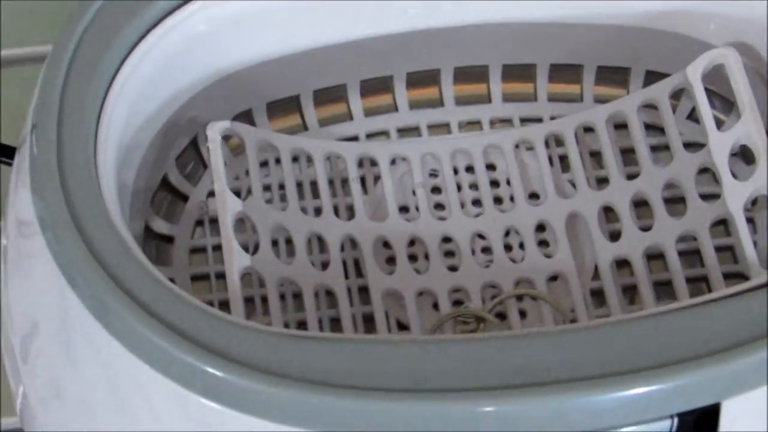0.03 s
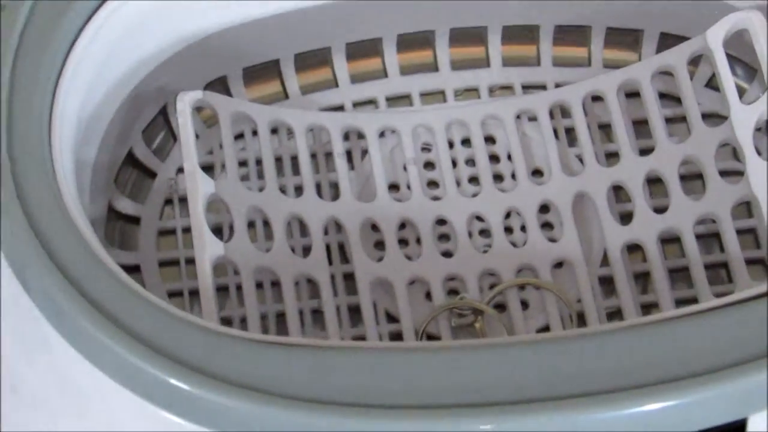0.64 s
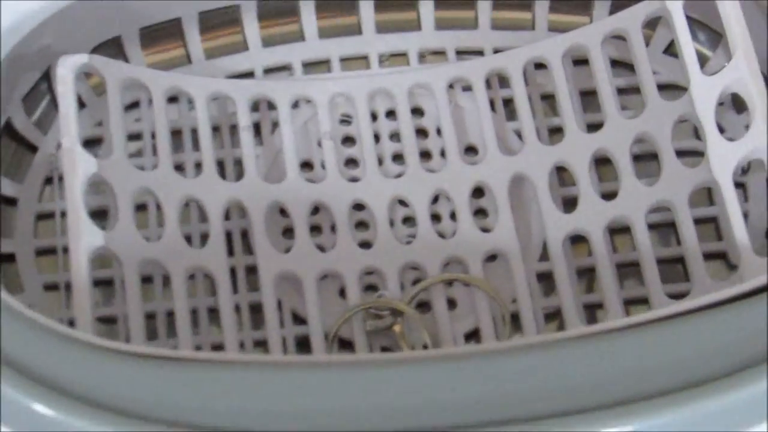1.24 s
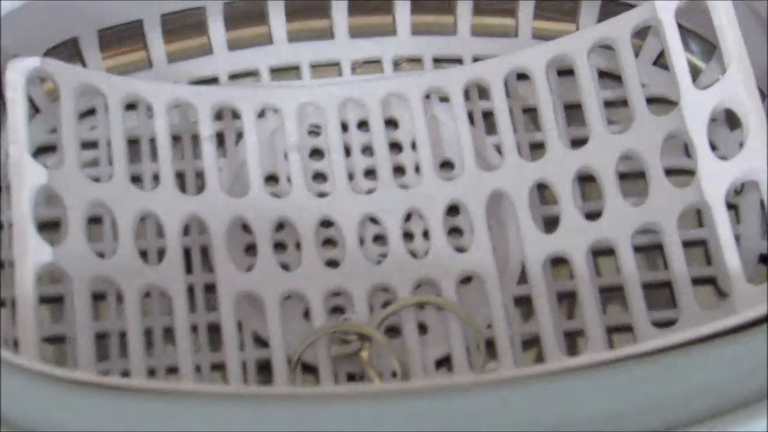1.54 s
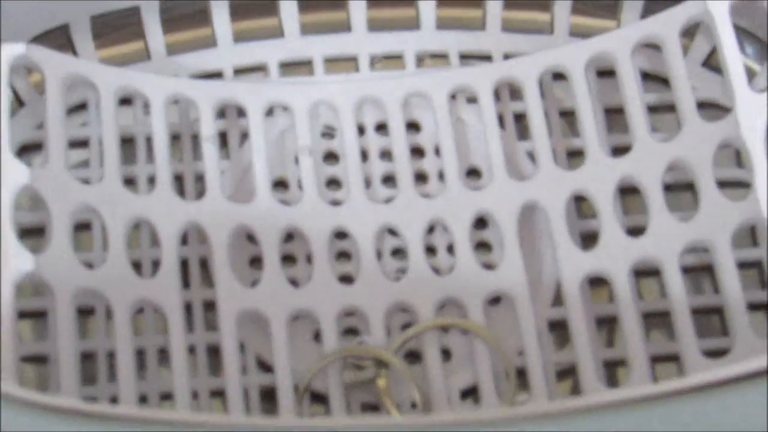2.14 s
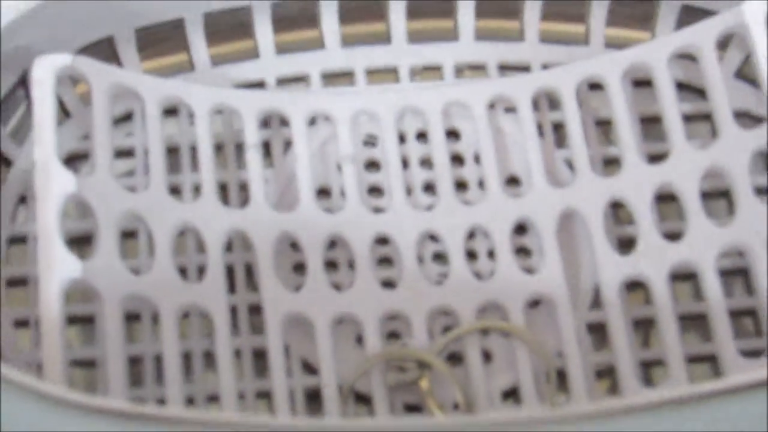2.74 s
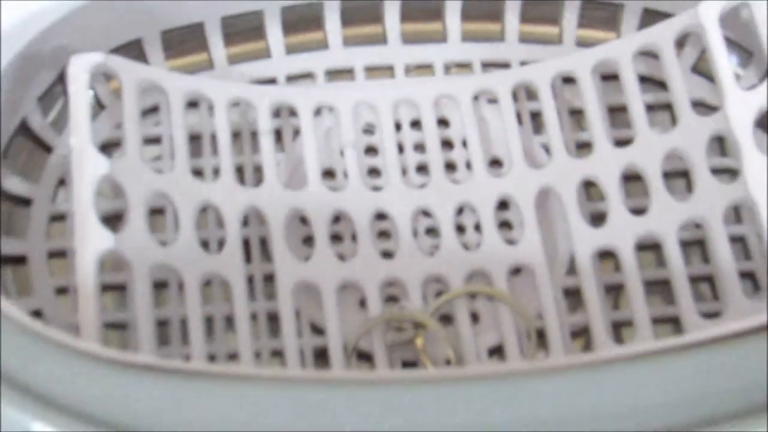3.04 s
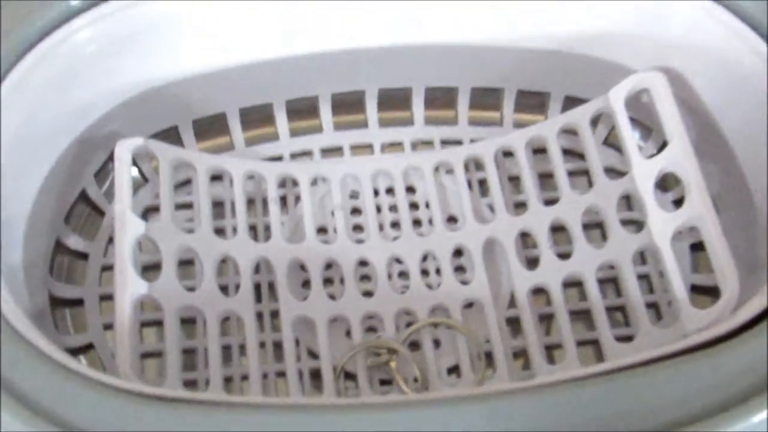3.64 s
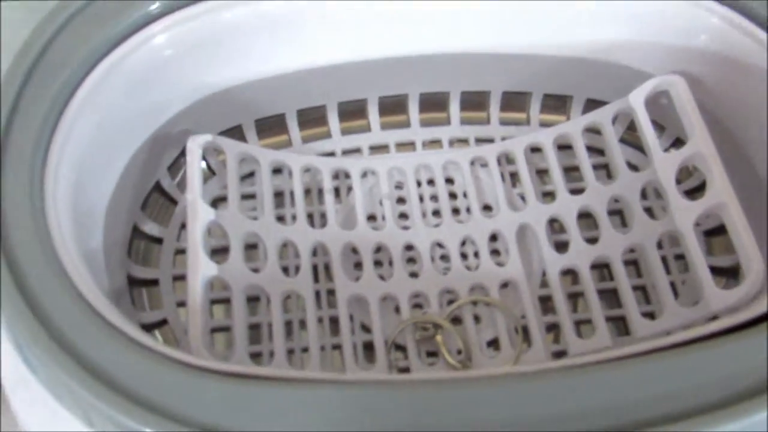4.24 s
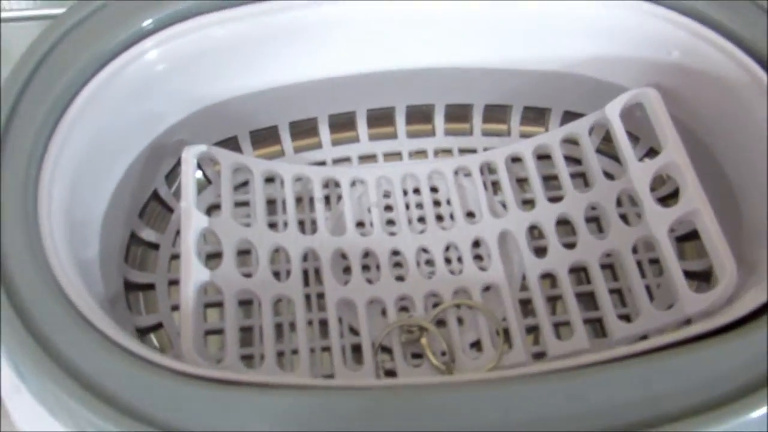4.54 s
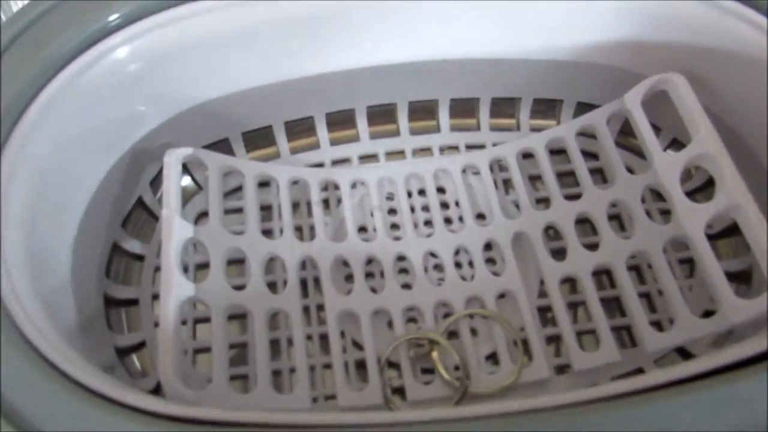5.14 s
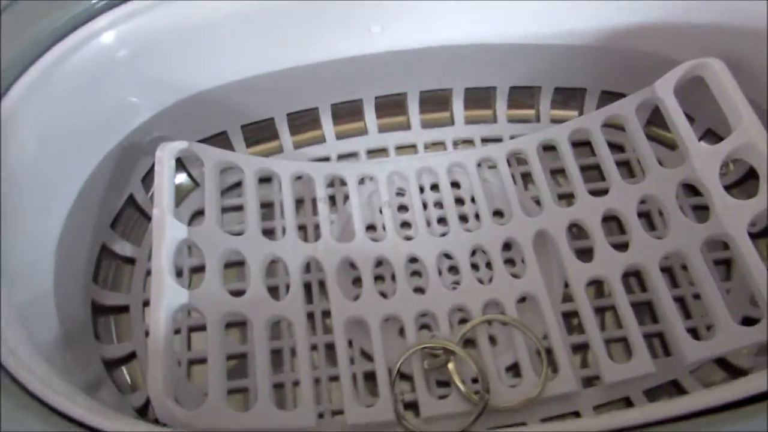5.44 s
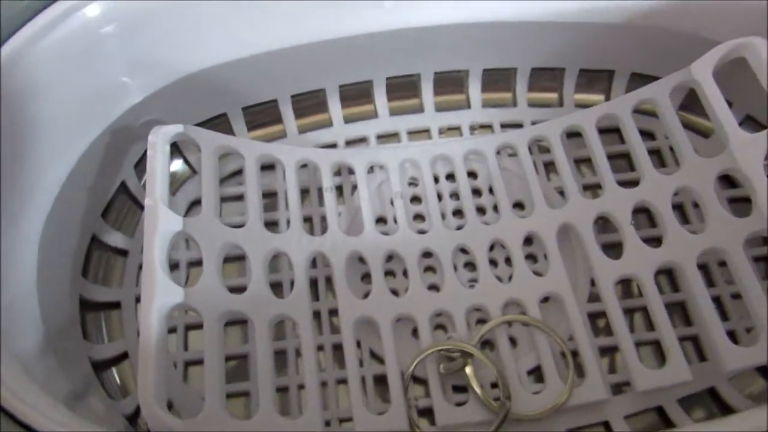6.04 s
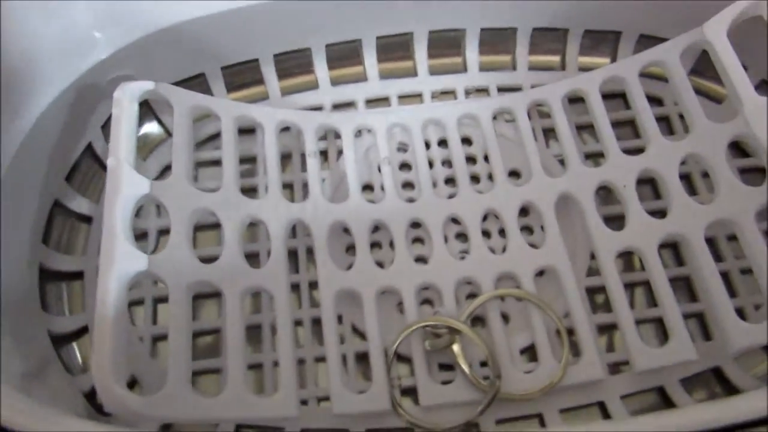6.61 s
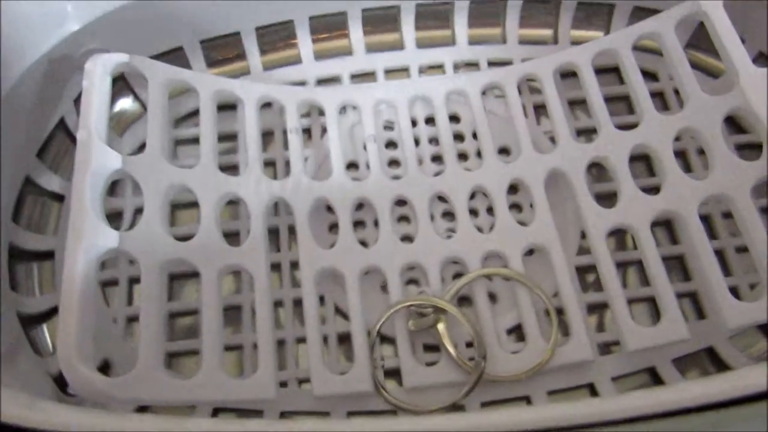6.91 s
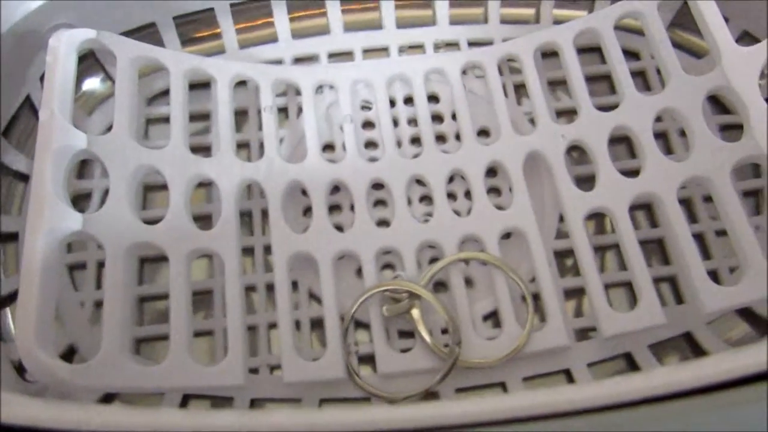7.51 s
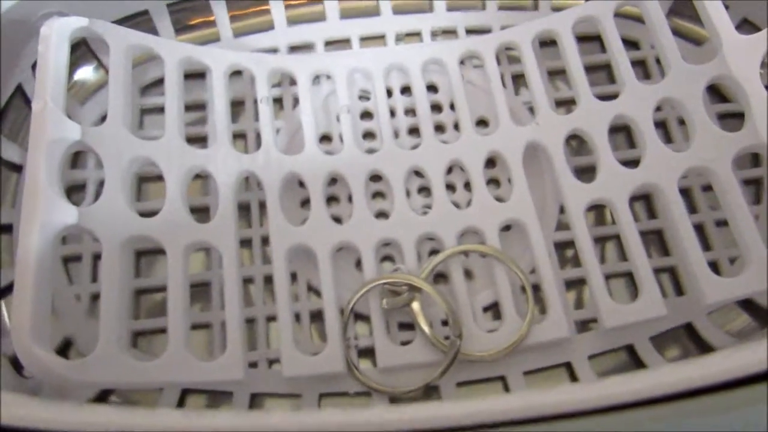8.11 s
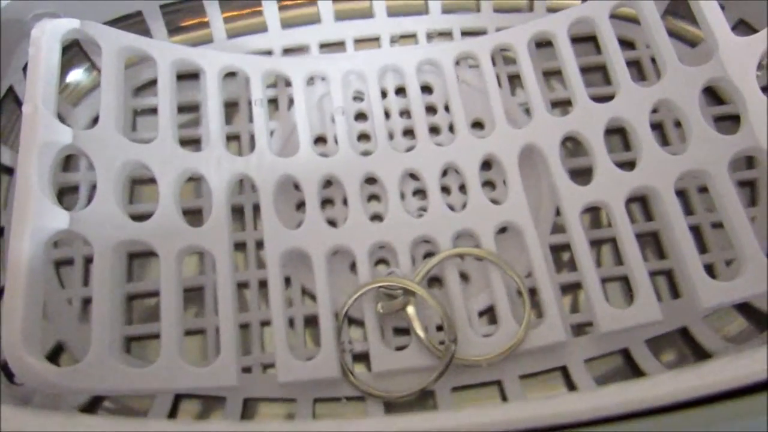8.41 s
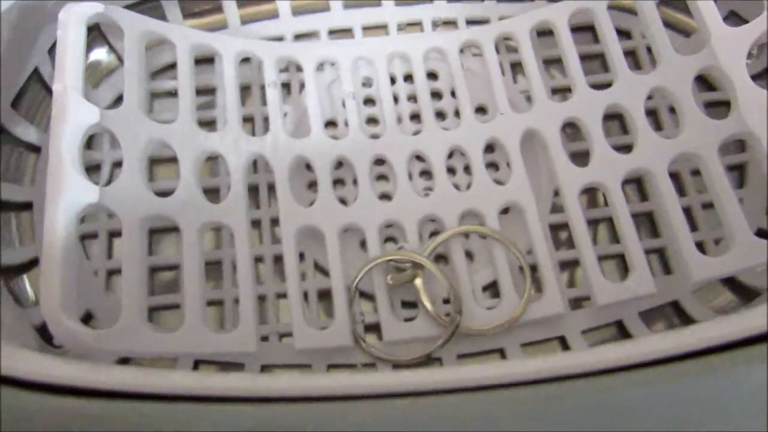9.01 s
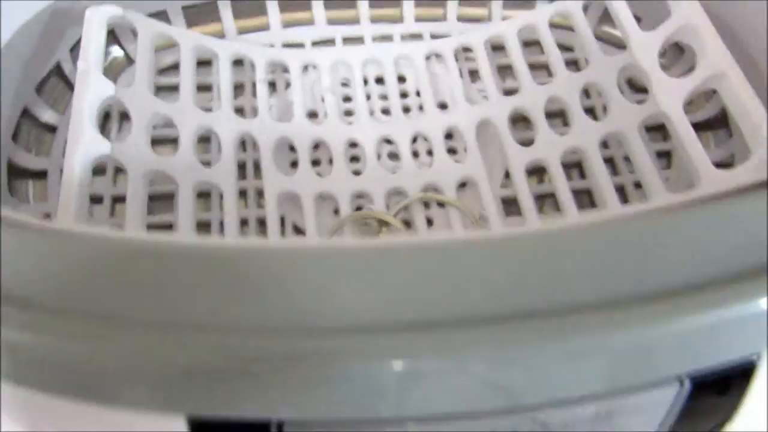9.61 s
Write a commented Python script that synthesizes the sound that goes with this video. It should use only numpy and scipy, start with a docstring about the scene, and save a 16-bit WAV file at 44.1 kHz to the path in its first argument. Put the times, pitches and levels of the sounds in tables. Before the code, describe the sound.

A small ultrasonic cleaner runs for about ten seconds in a quiet room, heard in stereo from a hand-held microphone close above the open tank. The main sound is a bright, high hiss of collapsing bubbles, pulsing so fast that it buzzes. Under it are a low, fluttering thrum with irregular brief surges, a light tank rattle and faint mains hum. Short, sharp cracks poke through, for example near 0.6, 1.7, 2.2, 7.4 and 7.7 seconds, with a cluster around 8.5 to 9. At about 2.7 seconds the basket gives one faint clink; the hiss then softens and the rattle nearly disappears. Both come back around 6 seconds, when the thrum also grows stronger, swelling near 6.3, 7.8 and from 9 to the end. A few soft, low handling bumps fall between 5 and 10 seconds. The cleaner is still running at the end.

```python
"""A buzzing hiss over a low, fluttering thrum: a small ultrasonic cleaner in a quiet room, taken in
stereo on a hand-held camera close above the open tank. The transducer is driven once per mains cycle;
each burst collapses a cloud of bubbles (the hiss, now and then a crack) and rattles the tank.
The ultrasound itself is rectified in the two microphone ports and comes out as the thrum.
Underneath are mains hum, one clink in the basket and a few soft handling bumps."""
import sys
import numpy as np
from scipy import signal
from scipy.fft import rfft, irfft, next_fast_len
from scipy.io import wavfile
from scipy.ndimage import uniform_filter1d, map_coordinates

SR = 44100
rng = np.random.default_rng(int(sys.argv[2]) if len(sys.argv) > 2 else 0)


def output_pcm(signal):
    """Save a mono or channel-first signal as 16-bit PCM at the path in sys.argv[1].

    Samples are clipped to [-1, 1] before scaling.
    """
    pcm = np.clip(np.atleast_2d(signal).T, -1, 1) * 32767
    wavfile.write(sys.argv[1], SR, np.round(pcm).astype(np.int16))


N = 434826
TIME = np.arange(N) / SR
MAINS_HZ, CREST = 60.005, .645  # the drive peaks at this share of the mains cycle
CYCLE = TIME * MAINS_HZ - CREST + 1.5  # whole numbers fall between the bursts
FROM_CREST_S = (CYCLE % 1 - .5) / MAINS_HZ  # time from the nearest crest of the drive
SWAY_RATE = 19  # changes per second as rocking water shifts the standing waves

# Ultrasound at the ports as the microphone moves over the tank.
# Each row: time in seconds, strength in dB (used about its mean), typical push width in seconds.
BEAM = [(0, -55, 0.00042), (.38, -53.5, 0.0017), (.5, -47.5, 0.0019), (.72, -47, 0.0029),
        (.87, -42.5, 0.0016), (1.05, -46, 0.0023), (1.2, -42, 0.0015), (1.38, -48, 0.0024),
        (1.76, -43.5, 0.0025), (1.98, -51, 0.002), (2.25, -47, 0.00065), (2.55, -56.5, 0.0021),
        (2.95, -49, 0.0012), (3.15, -46, 0.0014), (3.58, -44.5, 0.0016), (3.68, -42, 0.0025),
        (3.88, -53, 0.0012), (4.1, -47.5, .0016), (4.5, -42, 0.002), (5.16, -49.5, 0.0011),
        (5.38, -44, 0.0015), (5.5, -48.5, 0.0015), (5.88, -49, 0.0014), (6.08, -38.5, 0.00097),
        (6.18, -43, 0.0014), (6.27, -34.5, 0.00076), (6.43, -36.5, 0.0012), (6.64, -56, 0.0017),
        (6.78, -47, 0.0023), (6.88, -45.5, .001), (7.11, -40, 0.0013), (7.22, -44, 0.0015),
        (7.45, -41, 0.0022), (7.6, -42, 0.0031), (7.78, -32.5, 0.0015), (7.95, -39, 0.002),
        (8.36, -38.5, 0.002), (8.55, -39, 0.0022), (9, -44.5, 0.002), (9.16, -35, 0.0022),
        (9.28, -52, 0.00039), (9.54, -41.5, 0.0028), (9.74, -35, 0.0013), (9.86, -34.5, 0.0012)]
# Bubble collapses heard through the water. Each row: frequency in Hz, relative level in dB.
HISS_SPECTRUM = [(300, -17), (2000, -26), (2800, -30.5), (3300, -25.5), (3800, -26.5), (4400, -14.5),
                 (5150, -9.5), (5700, -10.5), (6700, -10), (7600, -4), (8200, -2.5), (8950, 4), (9900, 4),
                 (10800, 1), (11600, 1.5), (13200, -4.5), (15700, 3)]
# Their stereo image. Each row: frequency in Hz, left-right likeness (1 is mono).
HISS_ALIKE = [(4000, 1), (6500, 0.98), (8000, 0.66), (10000, 0.92), (12000, 0.49), (15500, 0.29)]


def amp(db):
    """Decibels to gain."""
    return 10 ** (np.asarray(db) / 20)


def unit(x):
    """x at rms 1."""
    return x / np.sqrt(np.mean(x ** 2) + 1e-20)


def along(points, hz):
    """(Hz, value) points read on a log axis."""
    freqs, values = np.transpose(points)
    return np.interp(np.log(hz + 1), np.log(freqs), values)


def curves(rows):
    """One value per sample for each column after the time."""
    times, *columns = np.transpose(rows)
    return [np.interp(TIME, times, column) for column in columns]


def wobble(rate):
    """A smooth random curve at rms 1, with rate knots a second."""
    return unit(map_coordinates(rng.uniform(-1, 1, 1024), [TIME * rate], mode="wrap"))


def per_cycle():
    """A bounded random value held through each mains cycle."""
    return np.clip(rng.standard_normal(int(CYCLE[-1]) + 1), -2, 2)[CYCLE.astype(int)]


def swells(rows, half_s):
    """Bell-shaped swells. Each row: centre in seconds, height."""
    t = TIME[::32]
    return np.interp(TIME, t, sum(height * np.exp(-.5 * ((t - s) / half_s) ** 2) for s, height in rows))


def bursts(rise_s, fall_s, delay_s, scatter_db):
    """One bell-shaped swell per mains cycle, each of its own size."""
    t = FROM_CREST_S - delay_s
    return amp(scatter_db * per_cycle()) * np.exp(-.5 * (t / np.where(t < 0, rise_s, fall_s)) ** 2)


def filtered(x, response):
    """x through a complex response given as a function of Hz."""
    size = next_fast_len(N + SR // 2)
    return irfft(rfft(x, size) * response(np.fft.rfftfreq(size, 1 / SR)), size)[..., :N]


def stereo(pair, spectrum, alike):
    """Two unrelated signals, coloured and mixed to a left and right of given likeness."""
    def response(hz):
        turn = np.arccos(np.clip(along(alike, hz), -1, 1)) / 2
        return amp(along(spectrum, hz)) * [np.cos(turn), np.sin(turn)]
    mid, side = filtered(pair, response)
    return unit(np.array([mid + side, mid - side]))


def recurring(memory_s, fresh):
    """Two noises that nearly repeat every mains cycle, with a share of fresh noise."""
    period = round(SR / MAINS_HZ)
    carry = np.exp(-1 / (MAINS_HZ * memory_s))
    draws = rng.standard_normal((2, N // period + 1, period))
    start = carry * rng.standard_normal((2, 1, period))
    pattern = signal.lfilter([np.sqrt(1 - carry ** 2)], [1, -carry], draws, axis=1, zi=start)[0]
    pattern = pattern.reshape(2, -1)[:, :N]
    return np.sqrt(1 - fresh) * pattern + np.sqrt(fresh) * rng.standard_normal((2, N))


def room_tone():
    """The quiet room: a low, steady rush, nearly the same left and right."""
    # Each row: frequency in Hz, relative level in dB.
    spectrum = [(20, -8), (60, 4.5), (200, 10.5), (600, 0), (1300, -1.5), (1800, -22), (2600, -42)]
    return amp(-56.5) * stereo(rng.standard_normal((2, N)), spectrum, alike=[(100, .81), (1000, 1)])


def reflections(x):
    """The room answers, treble dying first; the moving microphone blends four sets of reflections."""
    # Each row: frequency in Hz, seconds to fall 60 dB.
    decay = [(300, 0.18), (4000, 0.073), (15000, 0.0029)]
    hz, _, noise = signal.stft(rng.standard_normal((4, 2, SR // 4)), SR, nperseg=256)
    t = np.linspace(0, 1 / 4, noise.shape[-1])
    tails = signal.istft(noise * amp(-60 * t / along(decay, hz)[:, None]), SR, nperseg=256)[1]
    blend = np.array([wobble(rate=3) for _ in tails])
    blend /= np.linalg.norm(blend, axis=0)
    return sum(share * signal.oaconvolve(x, tail / np.linalg.norm(tail[0]), axes=1)[:, :N]
               for share, tail in zip(blend, tails))


def hum(beam_db):
    """The power supply hums at the mains frequency and its octave, louder where the thrum is strong."""
    nearness_db = 0.7 * uniform_filter1d(beam_db, size=SR // 2)
    tone = np.cos(2 * np.pi * (CYCLE - .41)) + amp(-7) * np.cos(4 * np.pi * (CYCLE - .53))
    return amp(-54.5) * unit(amp(nearness_db) * tone)


def handling():
    """Soft bumps of the hand on the camera reach each microphone port differently."""
    # Each row: time in seconds, level in dB.
    bumps = [(5.25, -45), (5.39, -45), (6.52, -44), (6.92, -43), (7.82, -46), (7.89, -41), (9.59, -48),
             (9.751, -37)]
    spectrum = [(25, 10), (110, 8), (300, 18), (2500, -83)]  # Hz, dB
    rumble = stereo(rng.standard_normal((2, N)), spectrum, alike=[(100, -0.46)])
    return swells([(s, amp(db)) for s, db in bumps], half_s=0.012) * rumble


def clink():
    """A light tap on the basket: one mode dies at once, the others ring on briefly and roughly."""
    # Each row: start in seconds, level in dB.
    taps = [(2.654, -44)]
    # Each row: frequency in Hz, relative level in dB, seconds to fall 60 dB.
    modes = [(2360, 4, 0.068), (2300, -6, 0.47), (2730, -5, 0.24), (2940, -13, .2)]
    sound = np.zeros(N)
    for start, db in taps:
        t = np.maximum(TIME - start, 0)
        ring = sum(amp(mode_db - 60 * t / t60) * np.sin(2 * np.pi * hz * t + 2 * wobble(rate=260))
                   for hz, mode_db, t60 in modes)
        sound += amp(db) * ring * (1 - np.exp(-t / .001))
    return sound


def rattle(churn_db):
    """Each burst jolts the tank and bubbles patter on its walls; its resonances come and go."""
    # How hard the tank buzzes. Each row: time in seconds, level in dB.
    buzz = [(0, -55), (2.2, -54.5), (2.7, -59), (2.77, -68.5), (5.3, -67.5), (6.1, -59.5), (8, -57),
            (9.86, -58)]
    # Tank and basket resonances. Each row: frequency in Hz, width in Hz, relative level in dB.
    modes = [(2284, 130, -1), (2586, 113, 1.5), (2835, 98, 4), (3132, 84, -1), (3654, 106, 4),
             (3965, 165, 4.5)]
    level_db, = curves(buzz)
    jolts = unit(np.diff(np.floor(CYCLE - .5), prepend=0) * amp(2 * per_cycle()))
    patter = unit(rng.standard_normal(N) * bursts(rise_s=.0084, fall_s=.0063, delay_s=0, scatter_db=3))
    force = jolts + amp(3) * patter

    def resonance(centre, width):
        return filtered(force, lambda hz: (1j * hz * width / (centre**2 - hz**2 + 1j * hz * width)) ** 2)
    ring = sum(amp(db + 2 * wobble(rate=7)) * resonance(centre, width) for centre, width, db in modes)
    return amp(level_db + churn_db) * unit(ring)


def beam_strength():
    """Ultrasound at the ports in dB about its average: a drift, and a sway from the rocking water."""
    drift_db, _ = curves(BEAM)
    return drift_db - drift_db.mean() + 0.8 * wobble(SWAY_RATE)


def thrum(beam_db):
    """Each burst is rectified into one pointed push of pressure, alike in both microphone ports."""
    # Knocks as standing-wave crests sweep over the ports. Each row: time in seconds, rise in dB.
    knocks = [(.228, 9.5), (.511, 8), (.545, 1), (.878, 5.5), (1.445, 6), (2.061, 8), (2.278, 7),
              (2.478, 13), (2.644, 15.5), (3.061, 11.5), (3.244, 5), (3.378, 9.5), (3.544, 7.5),
              (3.778, 12), (3.943, 9), (3.961, 15), (4.411, 0), (4.728, -2), (4.794, 6), (4.844, 6),
              (5.061, 14.5), (5.078, 2), (5.244, 13.5), (5.378, 9), (5.411, 10), (5.578, 10), (5.694, 9),
              (5.961, 6), (6.111, 12), (6.527, 11.5), (6.911, 15.5), (6.961, 9.5), (7.011, 5), (7.078, 5.5),
              (7.094, 6.5), (7.111, 3), (7.178, 10.5), (7.361, 10), (7.394, 7), (7.511, 4.5), (8.611, 5),
              (8.944, 10), (9.327, 13), (9.594, 11)]
    knock_db = swells(knocks, half_s=0.0098)
    _, width_s = curves(BEAM)
    width_s = width_s * amp(3 * per_cycle() - .3 * knock_db)  # a knock sharpens the push
    t = FROM_CREST_S - .00075
    pushes = amp(per_cycle()) * np.exp(-abs(t / width_s) ** 1.59)  # more pointed than a bell
    grit = unit(filtered(rng.standard_normal(N), lambda hz: 1 / (1 + ((hz - 1435) / 450) ** 4)))
    pushes *= 1 + amp(-26) * grit
    # the microphone passes no steady pressure, so each push is followed by a dip
    bass_cut = lambda hz: 1j * hz / (70 + 1j * hz) / np.sqrt(1 + (92 / (hz + 1)) ** 8)
    pushes /= np.std(filtered(pushes, bass_cut))
    return filtered(amp(-49 + 0.93 * beam_db + knock_db) * pushes, bass_cut)


def flutter(beam_db):
    """Beats between the ultrasound's paths ripple each push, partly opposite in the two ports."""
    # Strength of the beats. Each row: time in seconds, level in dB (used about its mean).
    ripple = [(0.0, -48.0), (0.72, -44.0), (1.14, -46.5), (1.3, -43.0), (1.54, -48.0), (1.62, -39.5),
              (1.9, -44.5), (2.0, -39.0), (2.64, -44.0), (2.74, -48.0), (3.14, -41.0), (3.58, -41.5),
              (3.68, -39.0), (3.86, -44.5), (3.94, -39.0), (5.1, -38.5), (5.14, -43.5), (5.4, -35.5),
              (5.44, -44.5), (5.62, -39.5), (5.64, -44.5), (5.94, -39.0), (6.26, -36.0), (6.78, -42.5),
              (6.94, -36.0), (7.36, -38.0), (7.7, -33.5), (7.98, -38.5), (8.14, -35.5), (8.32, -39.5),
              (8.64, -35.0), (9.0, -38.5), (9.12, -34.5), (9.28, -41.5), (9.36, -37.5), (9.48, -42.0),
              (9.72, -34.0), (9.84, -35.0)]
    # Their colour. Each row: frequency in Hz, relative level in dB.
    spectrum = [(40, -55), (120, -11), (240, 0.5), (380, 1.5), (650, -3), (1000, -8.5), (1500, -36.5),
                (2200, -54), (4000, -89)]
    on_s, off_s, stall_s = -0.0029, 0.002, 0.0084  # counted from the crest of the drive
    evenness = 0.47  # 0 lets the bursts vary freely in strength, 1 levels them
    level_db, = curves(ripple)
    ripple_db = level_db - level_db.mean() + 3.5 * wobble(SWAY_RATE)
    pattern = filtered(recurring(memory_s=.09, fresh=.27), lambda hz: amp(along(spectrum, hz)))
    slowed = (TIME - FROM_CREST_S ** 2 / (2 * stall_s)) * SR  # the beats slow through each burst
    drive = (1 + np.tanh((FROM_CREST_S - on_s) / .00058)) * (1 - np.tanh((FROM_CREST_S - off_s) / .00053))
    beats = drive * np.array([map_coordinates(row, [slowed], mode="nearest") for row in pattern])
    cycle = CYCLE.astype(int)
    burst_energy = np.array([np.bincount(cycle, row ** 2)[cycle] for row in unit(beats)])
    strength = np.sqrt(burst_energy * MAINS_HZ / SR + .05)
    evened = filtered(beats / strength ** evenness, lambda hz: (1j * hz / (95 + 1j * hz)) ** 2)
    mid_db = -51.5 + 0.66 * ripple_db + 0.085 * beam_db
    side_db = -43 + ripple_db
    mid, side = amp([mid_db, side_db]) * unit(evened)
    return np.array([mid + side, mid - side])


def spits():
    """Now and then a whole cluster of bubbles collapses at once with a sharp crack."""
    # Each row: start in seconds, starting level in dB.
    cracks = [(0.626, -19), (0.728, -27), (0.876, -20), (1.7242, -19), (2.224, -17), (3.359, -24),
              (3.96, -23), (4.408, -30), (4.4763, -23), (4.692, -33), (5.475, -36), (5.756, -22.5),
              (5.974, -21), (6.3255, -29), (6.628, -32), (7.394, -20), (7.662, -17), (8.242, -39),
              (8.5075, -32), (8.5415, -27), (8.5764, -19.5), (8.626, -23), (8.8103, -20), (9.091, -21)]
    t = np.arange(SR // 100) / SR
    envelope = np.zeros(N)
    for start, db in cracks:
        envelope[round(start * SR):][:len(t)] += amp(db - 60 * t / .018)
    return envelope * stereo(rng.standard_normal((2, N)), HISS_SPECTRUM, HISS_ALIKE)


def shimmer(x, depth_db=0.82):
    """As the cloud moves about the tank, each band of x swells and fades on its own."""
    bands = signal.stft(x, nperseg=256)[2]
    drift = uniform_filter1d(rng.standard_normal(bands.shape[1:]), size=4, axis=0)
    drift = uniform_filter1d(drift, size=50, axis=1)
    return signal.istft(bands * amp(depth_db * unit(drift)), nperseg=256)[1][:, :N]


def cavitation(churn_db):
    """Bubbles collapse in each burst, close under the microphone; the finest fizz between bursts too."""
    # The bubble cloud. Each row: time in seconds, hiss level in dB, then low sizzle and top fizz
    # in dB against the hiss, all three before the trims below.
    levels = [(0.0, -37.5, -16, -2), (0.05, -35.5, -18.5, -8), (0.22, -35.5, -15, -4.5),
              (1.98, -34.5, -14, -5.5), (2.25, -34.5, -12.5, -4), (2.45, -35.5, -15.5, -6),
              (2.72, -39, -13.5, -4), (2.76, -43, -18, -3), (2.98, -42.5, -19, 1), (3.03, -40.5, -18.5, 0),
              (3.65, -41.5, -17.5, -0.5), (4.8, -38, -20, -2), (5.04, -38, -16.5, -2),
              (5.12, -42.5, -19.5, -4.5), (5.3, -38.5, -17.5, -4), (5.65, -40, -17, -5),
              (6, -36.5, -14, -5.5), (8.24, -37, -11.5, -6), (8.57, -34.5, -14, -9), (8.87, -36, -12.5, -6),
              (9.14, -34, -9.5, -6), (9.25, -39, -11.5, -3), (9.8, -37, -14.5, -7), (9.86, -36.5, -12, -21)]
    # Each row: time in seconds, steady fizz in dB against the bursts, scatter of burst sizes in dB.
    cloud = [(0, -7, 0), (2.4, -8.5, 1), (3, -9.5, 1.5), (3.5, -9, 2), (3.7, -9.5, 2.2), (5.5, -11, 1.5),
             (6.2, -13, 0.84), (9.86, -12.5, 1.0)]
    # The finest bubbles. Each row: frequency in Hz, relative level in dB.
    fizz_spectrum = [(1500, 0.5), (2700, -1.5), (3300, -2.5), (3800, 3.5), (4500, 7), (7000, 10.5),
                     (10000, 17), (13500, 15.5), (15700, 14.5)]
    # Their stereo image. Each row: frequency in Hz, left-right likeness.
    fizz_alike = [(3000, 1), (6000, 1), (9000, 0.6), (15000, .25)]
    hiss_db, sizzle_db, top_db = curves(levels)
    fizz_db, scatter_db = curves(cloud)
    snaps = amp(1.1 * np.repeat(rng.standard_normal(N // 12 + 1), 12)[:N])  # about a quarter ms each
    swell = bursts(rise_s=.0017, fall_s=.0024, delay_s=-.00047, scatter_db=scatter_db)
    pops = unit(rng.standard_normal((2, N)) * swell * snaps)
    fizz = stereo(rng.standard_normal((2, N)), fizz_spectrum, fizz_alike)
    hiss = stereo(pops + amp(-8) * reflections(pops), HISS_SPECTRUM, HISS_ALIKE) + amp(fizz_db) * fizz
    # big bubbles sizzle below the main band and fine ones fizz above it, in shifting shares
    sizzle = filtered(hiss, lambda hz: 1 / (1 + (hz / 7000) ** 12))
    top = filtered(hiss, lambda hz: 1 - 1 / (1 + (hz / 12500) ** 24))
    main = hiss - sizzle - top
    bands = unit(main) + amp(sizzle_db + 0.5) * unit(sizzle) + amp(top_db + 3.5) * unit(top)
    return amp(hiss_db + 1.5 + churn_db) * shimmer(bands)


def scene():
    """The cleaner from just above its tank, over quiet room tone."""
    churn_db = 0.79 * wobble(rate=12)  # the churning cloud moves hiss and rattle together
    beam_db = beam_strength()
    air = room_tone()
    tank = cavitation(churn_db) + spits() + rattle(churn_db)
    ports = thrum(beam_db) + flutter(beam_db)
    return air + hum(beam_db) + clink() + handling() + ports + tank


def record(dry):
    """The camera keeps nothing above its band limit."""
    return filtered(dry, lambda hz: hz < 15880)


dry = scene()
out = record(dry)
output_pcm(out)
```